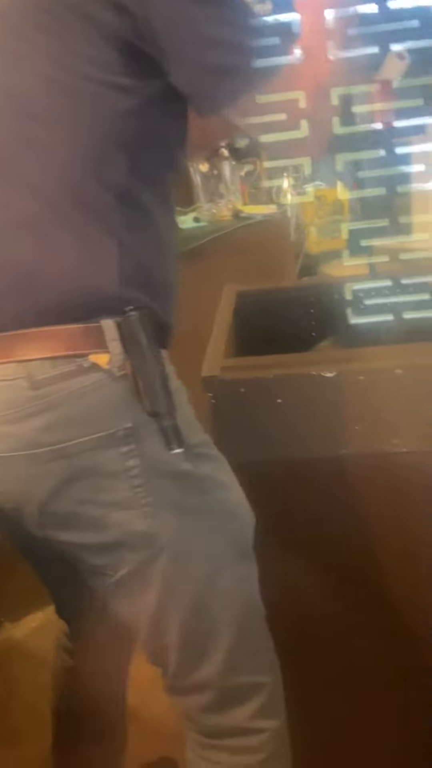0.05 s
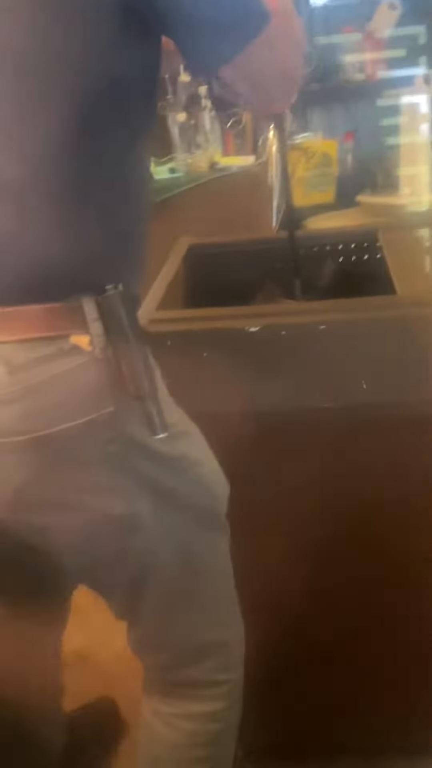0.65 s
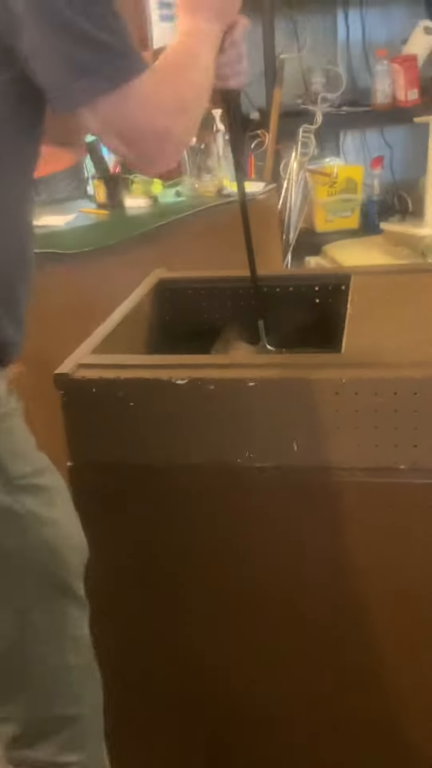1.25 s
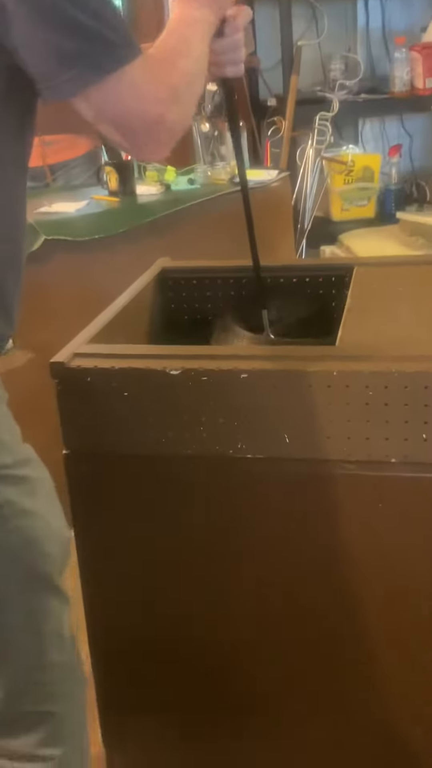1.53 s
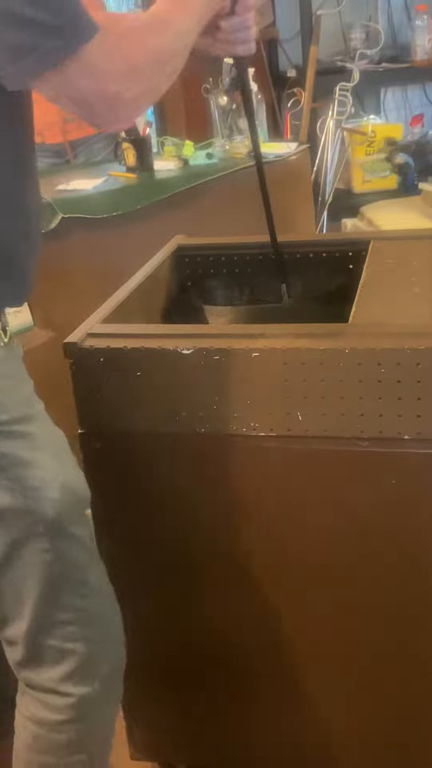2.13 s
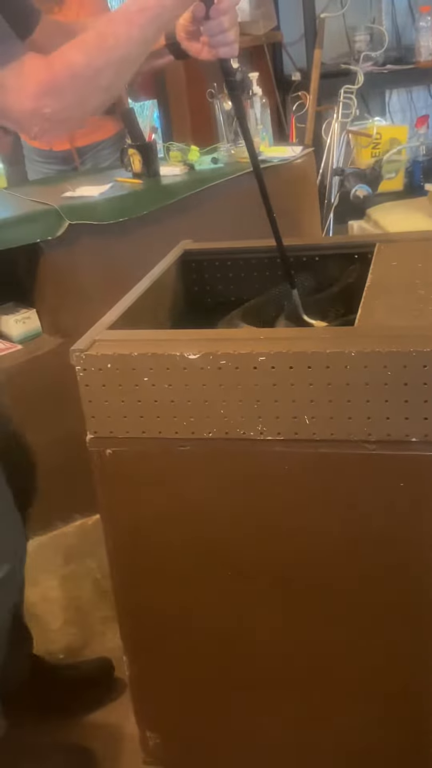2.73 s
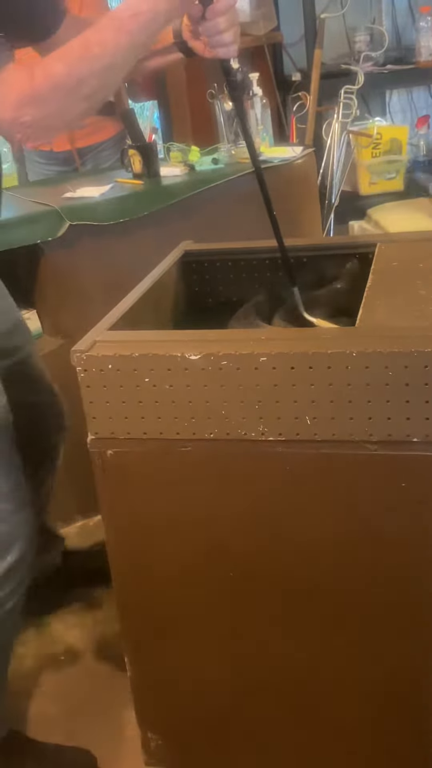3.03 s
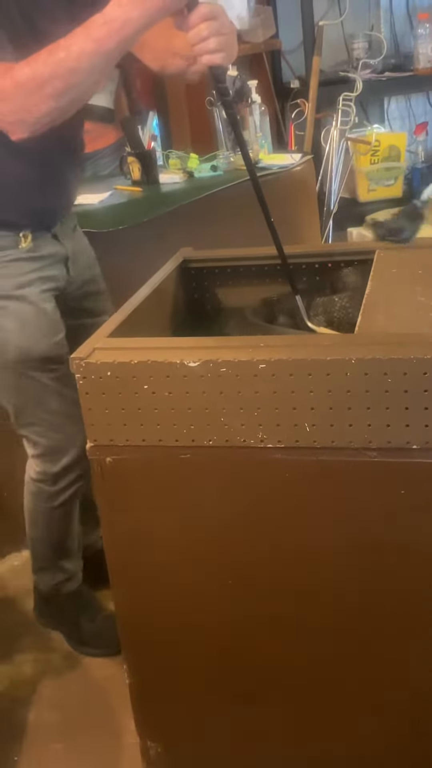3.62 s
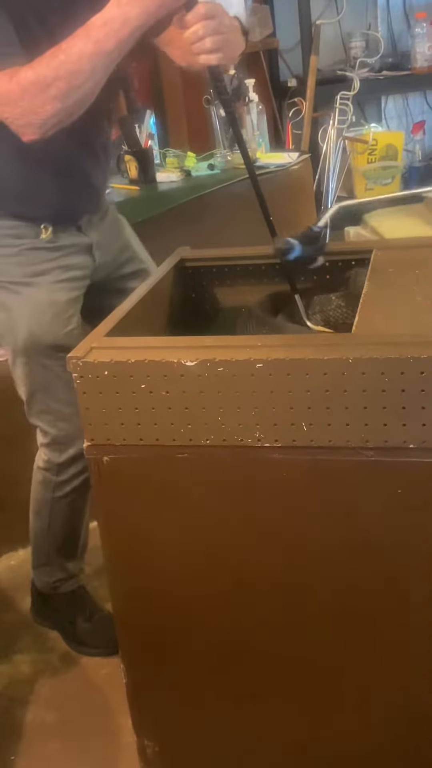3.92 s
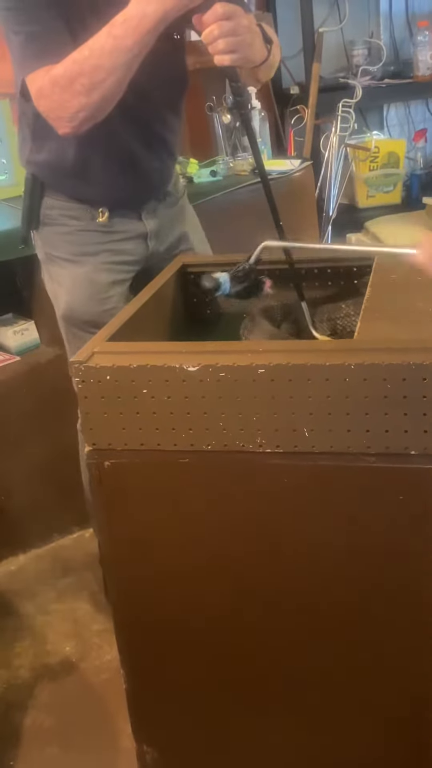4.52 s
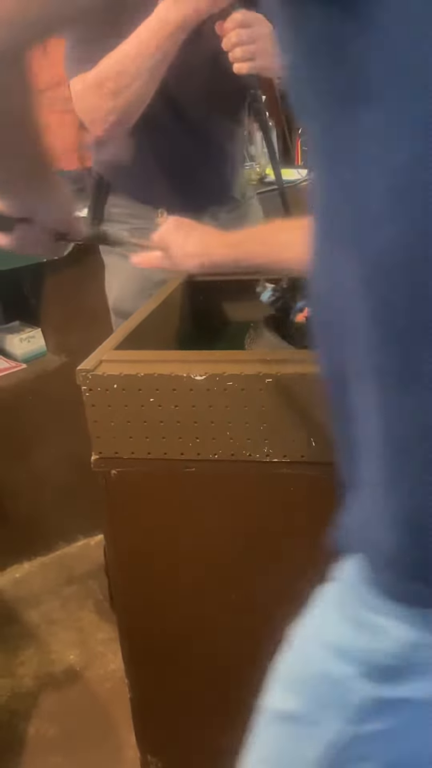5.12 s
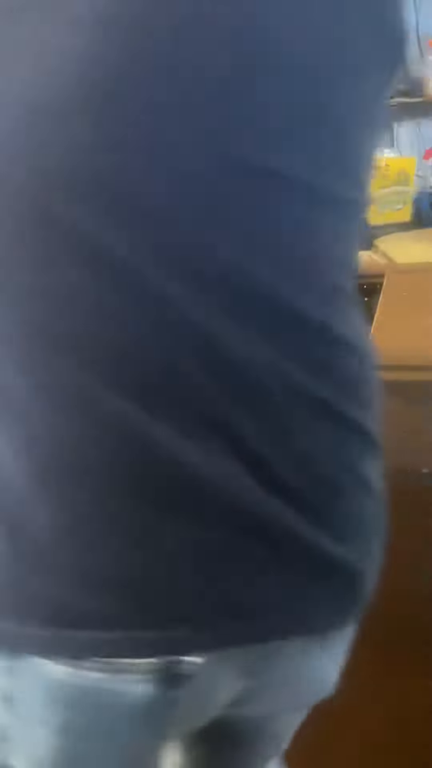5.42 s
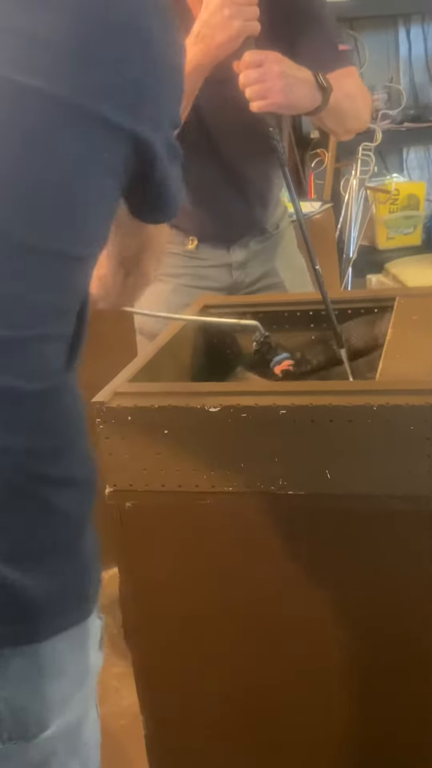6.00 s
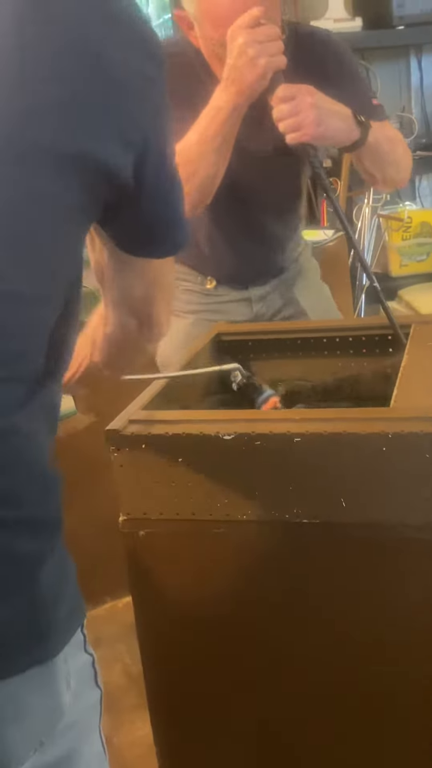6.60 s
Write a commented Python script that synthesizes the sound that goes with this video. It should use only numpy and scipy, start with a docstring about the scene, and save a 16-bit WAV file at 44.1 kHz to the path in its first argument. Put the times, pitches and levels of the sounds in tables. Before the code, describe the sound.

A steady low machine rumble with a drone, a motor hum and softly rushing air fills a room, louder for the first second and a half, when clothes also rustle faintly. A metal snake hook and tongs tap lightly on a wooden box at about 0.2 and 0.6 seconds. At 1.1 seconds comes the loudest event, a hard, sharp knock with a brief judder, followed at once by hollow, ringing wooden thuds. The room noise dips under it and swells back, and another dull bump lands at 1.4 seconds. Only the background continues until a low double thud at about 3.3 seconds, trailed by a few faint taps and a slight scuff up to 3.9 seconds. One more light knock with a thin metallic tick comes at 5.5 seconds. The hum swells around 6 seconds, and the rumble carries on to the end, near 6.7 seconds.

```python
"""In a room with a steady machine rumble, a metal snake hook and tongs bump against a wooden box.
Bending waves are dispersive, so each knock spreads through the panels treble first and bass last,
and the panel's modes ring on. Friction makes clothes rustle, a shoe scuff and the hook judder.
Behind them are rushing air, a low drone and a motor hum, louder at the start.
The hardest knock drives a limiter down, and the room swells back after it."""
import sys
import numpy as np
from scipy import signal
from scipy.fft import rfft, irfft
from scipy.io import wavfile
from scipy.ndimage import uniform_filter1d, minimum_filter1d

SR = 44100
rng = np.random.default_rng(int(sys.argv[2]) if len(sys.argv) > 2 else 0)


def int16_out(signal):
    """Quantize to a 16-bit WAV file."""
    q = np.round(np.clip(np.atleast_2d(signal).T, -1, 1) * 32767)
    wavfile.write(sys.argv[1], SR, q.astype(np.int16))


N = 297675
TIME = np.arange(N) / SR
FREQS = np.maximum(np.fft.rfftfreq(N, 1 / SR), 1)

# left-right likeness of the room noise: (frequency [Hz], correlation before clipping [-])
ROOM_CORRELATION = [(80, 1.5), (130, -0.4), (190, -0.52), (400, -0.2), (650, -0.88), (1000, 0),
                    (1900, 0.53), (3100, -.5), (4100, 0.23), (7000, -0.2)]
# balance of the room noise: (frequency [Hz], left minus right [dB])
ROOM_BALANCE = [(60, 6), (130, 3.5), (270, -3.5), (580, 0), (1240, 4.5), (2640, -2), (5620, 2.5),
                (12000, -1.5)]
# noise spectra of the ventilation and of cloth: (frequency [Hz], relative density [dB])
RUMBLE_SPECTRUM = [(18, -33), (30, -21), (40, -15), (52, -6), (68, -0.5), (82, -2), (97, -6), (120, -10.5),
                   (200, -17.5), (252, -11), (310, -22.5), (450, -22), (620, -33), (810, -70.5)]
RUSH_SPECTRUM = [(350, -48), (600, -24), (760, 3), (930, 2), (1080, -7), (1270, -8), (1540, -12),
                 (1800, -12.5), (2200, -26.5), (3000, -39.5), (3900, -75.5)]
HOLLOW_SPECTRUM = [(900, -30.5), (1150, -3.5), (1280, 6), (1420, -12), (1900, -19), (2400, -36)]
HISS_SPECTRUM = [(2200, -18.5), (3000, -2.5), (4100, 4), (5200, -2), (6000, -11), (7000, -23.5),
                 (9000, -46)]
CLOTH_SPECTRUM = [(20, -8), (40, 6), (100, -13), (160, -14), (280, -4.5), (600, 0), (1100, -8.5),
                  (1700, -24.5), (2500, -24.5), (3300, -47)]
# envelopes of the rushing air and the machine drone: (time [s], relative level [dB])
AIR_LEVELS = [(0.0, -48), (0.59, -52), (0.844, -48.5), (1.0, -47), (1.5, -53), (2.31, -55), (4.38, -51.5),
              (4.67, -53.5), (5.99, -47), (6.7, -48)]
DRONE_LEVELS = [(0.0, -30.5), (0.924, -26), (1.05, -27.5), (1.5, -35.5), (2.67, -36.5), (2.85, -41.5),
                (5.34, -49), (5.73, -38.5), (6.7, -42.5)]
# rubs of hook, cloth and shoe: (time [s], length [s], level [dB], band centre [Hz])
SCUFFS = [(0.252, .05, -55, 1200), (0.65, 0.03, -43, 1660), (1.06, .12, -70, 3990),
          (1.082, 0.02, -34, 322.8), (2.078, 0.093, -76, 3900), (3.576, 0.058, -69.5, 3900)]
# heavily damped resonances of hook and box: (frequency [Hz], width [Hz], relative level [dB])
BOX_RESONANCES = [(62, 53, -1.5), (185.3, 160, -1.5), (344, 134, -1), (559, 120, -7.5), (677, 380, -9),
                  (1084, 130, -18), (1464, 120, -14.5), (1690, 360, -16), (1980, 500, -20),
                  (2930, 480, -27.5), (3480, 600, -31), (4630, 380, -35), (5700, 900, -39),
                  (10200, 3500, -46.5), (14700, 2000, -52)]
# long-ringing modes of the panel: (frequency [Hz], relative level [dB], 60 dB decay time [s])
PANEL_MODES = [(164.3, -24, 0.6), (184, -25, 0.38), (250, -31.5, .3), (288, -33, 0.52), (339, -30, 0.22),
               (362, -21, 0.15)]
# lead of a knock in the right channel: (frequency [Hz], phase [rad])
RIGHT_PHASE_LEAD = [(100, .05), (330, .25), (550, .75), (1000, 1.1), (1800, .55), (4000, 1.1), (8000, 1.2),
                    (12000, 2.0)]
# knocks on the box: (time [s], strength [dB], upper corner [Hz], lower corner [Hz],
IMPACTS = [(0.2336, -22, 1100, 200, -4, -41, None), (0.561, -9.5, 131.7, 69, -23, -62, None),
           (0.6583, -16.5, 1610, 132.7, -20, -13, 0.034), (1.1006, 15, 9000, 42, -30.5, -33, 0.0064),
           (1.1490, 12.5, 476, 193, -13, -28, None), (1.168, 9.5, 320, 129, 6, -60, None),
           (1.1739, 12, 189, 107, -1, -65, None), (1.3650, 4.5, 242, 111.3, -20, -59.5, 0.016),
           (1.478, -32.5, 1200, 295.6, -25, -28, None), (3.2640, 1, 295, 112, -29, -31, 0.00394),
           (3.279, -4.5, 151, 60, -34, -53, None), (3.332, -22.5, 200, 149, -13, -62, None),
           (3.574, -26, 394, 145, -21, -34.5, None), (3.6745, -17, 416, 111, -32.5, -47.5, None),
           (3.849, -21.5, 178, 129, -9, -62, None), (5.4609, -16, 705, 110, -23.5, -24.5, .031)]
# a light graze: (upper corner [Hz], lower corner [Hz], ring gain [dB], tick gain [dB])
GRAZE_CONTACT = (749, 301, -17, -43.5)


def from_db(db):
    """Amplitude ratio: tenfold for every 20 dB."""
    return 10 ** (np.asarray(db) / 20)


def rms_one(x):
    """Normalisation to unit power."""
    return x / np.sqrt(np.mean(x ** 2) + 1e-20)


def in_time(points):
    """Linear interpolation of an envelope at every sample."""
    return np.interp(TIME, *np.transpose(points))


def at_hz(points, hz, **ends):
    """Interpolation on a log-frequency axis."""
    f, value = np.transpose(points)
    return np.interp(np.log(hz), np.log(f), value, **ends)


def panned(pan_db):
    """Level-difference panning: gains with the left pan_db above the right."""
    return from_db(np.array([[.5], [-.5]]) * pan_db)


def drift(rate_hz):
    """Random fluctuation: low-passed noise of unit power."""
    return rms_one(irfft(rfft(rng.standard_normal(N)) * np.exp(-(FREQS / rate_hz) ** 2), N))


def rise(s, spread_s):
    """A sigmoid step from 0 to 1 around time s."""
    return .5 + .5 * np.tanh((TIME - s) / (2 * spread_s))


def swell(s, length_s):
    """A Gaussian envelope of height 1 around time s."""
    return np.exp(-(2 * (TIME - s) / length_s) ** 2)


def unsettled():
    """A sigmoid fall: 1 during the louder start, 0 once the background has settled."""
    return 1 - rise(1.6, spread_s=.17)


def add(out, s, sound):
    """Superposition of a short sound from time s."""
    start = round(s * SR)
    out[:, start:start + sound.shape[-1]] += sound[..., :N - start]


def room_noise(spectrum, ripple_db=2.5):
    """A diffuse field is partly correlated at two points; the channels' mean has unit power."""
    # reflections leave fine fixed peaks and dips in the upper spectrum
    ripple = rms_one(uniform_filter1d(rng.standard_normal(len(FREQS)), size=250))
    ripple *= np.minimum(FREQS / 2000, 1)
    shape = from_db(at_hz(spectrum, FREQS, left=-90, right=-120) + ripple_db * ripple)
    mid, side = rfft(rng.standard_normal((2, N))) * shape
    correlation = np.clip(at_hz(ROOM_CORRELATION, FREQS), -.9, .98)
    side *= np.sqrt((1 - correlation) / (1 + correlation))
    pair = irfft(np.array([mid + side, mid - side]) * panned(at_hz(ROOM_BALANCE, FREQS)), N)
    return pair / pair.mean(axis=0).std()


def ventilation(rumble_follows=.35, hiss_follows=.37):
    """Broadband flow noise: rumble and hiss follow the air's swing in part; a hollow note joins."""
    air_db = in_time(AIR_LEVELS)
    swing_db = air_db - air_db.mean()
    rumble = from_db(-40 + rumble_follows * swing_db + 6 * unsettled()) * room_noise(RUMBLE_SPECTRUM)
    rush = from_db(-50 + swing_db) * room_noise(RUSH_SPECTRUM)
    hollow = from_db(-59.5) * rise(3.55, spread_s=.07) * room_noise(HOLLOW_SPECTRUM)
    hiss = from_db(-78 + hiss_follows * swing_db + 5 * unsettled()) * room_noise(HISS_SPECTRUM)
    return rumble + rush + hollow + hiss


def machines(drone_hz=68.3, excess_hz=8.5, sag_s=1.05, hum_hz=120.6, housing_hz=257, width_hz=22):
    """Periodic vibration radiates tones: a wavering drone with a resonant housing, and a motor hum."""
    level_db = in_time(DRONE_LEVELS)
    drone_gain = from_db(level_db - 1 + .9 * drift(8))
    # the drone runs a little fast at first and sags to its steady pitch
    pitch_hz = drone_hz + excess_hz * np.exp(-TIME / sag_s) + 1.2 * drift(1.2)
    drone = drone_gain * np.sin(2 * np.pi * np.cumsum(pitch_hz) / SR)
    hum_db = -54 + 7.5 * unsettled() + 15.2 * swell(6.01, length_s=1.58) + .4 * drift(2.7)
    hum = from_db(hum_db) * np.sin(2 * np.pi * hum_hz * TIME)
    resonance = 1 / (1 + ((FREQS - housing_hz) / width_hz) ** 4)
    housing = irfft(rfft(rng.standard_normal((2, N))) * resonance, N)
    tones = np.sqrt(2) * (drone + hum) * panned(5)
    return tones + from_db(level_db - 11) * rms_one(housing)


def rubbing(cloth_db=-64, lift_db=15.5):
    """Sliding friction makes noise: clothes rustle, louder at first, and grainy scuffs come and go."""
    cloth_shape = from_db(at_hz(CLOTH_SPECTRUM, FREQS, left=-90, right=-90))
    cloth = rms_one(irfft(rfft(rng.standard_normal(N)) * cloth_shape, N))
    out = from_db(cloth_db + lift_db * unsettled() + 1.6 * drift(12)) * cloth
    grains = rng.standard_normal(N) * from_db(2.5 * drift(250))
    for s, length_s, db, hz in SCUFFS:
        band = signal.butter(4, [hz * .6, hz * 1.35], "band", fs=SR, output="sos")
        out += from_db(db) * swell(s, length_s) * rms_one(signal.sosfilt(band, grains))
    return out * panned(1.5)


def judder(s=1.1035, pitch_hz=521, peak_db=3, right_lead_rad=.94):
    """Stick-slip oscillation: the hook skids for a few cycles as it lands the hardest knock."""
    phase = 2 * np.pi * pitch_hz * (TIME - s) + np.array([[0], [right_lead_rad]])
    return from_db(peak_db) * swell(s, length_s=.010) * np.sin(phase)


def bending_wave(hz, t, body_db=39, scatter_db=-17, scatter_t60=.07):
    """Dispersion: low frequencies travel slower, so a falling chirp passes the box's resonances."""
    power = sum(from_db(db) ** 2 / (1 + ((hz - f) / width) ** 2) ** 5 for f, width, db in BOX_RESONANCES)
    delay_s = .00655 * (300 / (hz + 20)) ** .8
    phase = 2 * np.pi * np.cumsum(delay_s) * SR / len(t)
    direct = from_db(body_db) * np.sqrt(power) * np.exp(-1j * phase)
    # edges and joints send back a short, dull scatter, different for every spot that is struck
    echoes = rng.standard_normal(len(t)) * from_db(-60 * t / scatter_t60)
    scatter = from_db(scatter_db) * rfft(echoes / np.linalg.norm(echoes))
    return direct * (1 + scatter / (1 + (hz / 1100) ** 2))


def panel_ring(t, ring_db, onset_s=.0054):
    """Free vibration: the spectrum of the panel's modes, each decaying exponentially."""
    modes = sum(from_db(db + ring_db - 60 * t / t60) * np.sin(2 * np.pi * f * t)
                for f, db, t60 in PANEL_MODES)
    return rfft(modes * (1 - np.exp(-(t / onset_s) ** 2)))


def knock(upper_hz, lower_hz, ring_db, tick_db, size):
    """Impact excitation: the spectrum of one contact multiplies the response of the box."""
    hz = np.maximum(np.fft.rfftfreq(size, 1 / SR), 1)
    t = np.arange(size) / SR
    response = bending_wave(hz, t) + panel_ring(t, ring_db)
    # a soft contact loses the treble, a light one cannot move the whole box
    contact = 1 / np.sqrt((1 + (hz / upper_hz) ** 4) * (1 + (lower_hz / hz) ** 4))
    # bare metal touching down adds a thin tick
    tick = from_db(tick_db) * np.exp(-3 * np.log(hz / 4800) ** 2)
    quarter_window_delay = np.exp(-2j * np.pi * hz * size / 4 / SR)
    right = response * (contact + tick) * quarter_window_delay
    left = right * np.exp(-1j * at_hz(RIGHT_PHASE_LEAD, hz))
    return irfft(np.array([left, right]), size)


def knocks(graze_db=-16.5, graze_follows=.69, size=32768):
    """Impulse responses add: hook and tongs strike the box, at times grazing it before they land."""
    out = np.zeros((2, N))
    for s, db, *contact, lead_s in IMPACTS:
        start_s = s - size / 4 / SR  # the contact lies a quarter of the way into its window
        add(out, start_s, from_db(db) * knock(*contact, size))
        if lead_s:
            graze = from_db(graze_db + graze_follows * db) * knock(*GRAZE_CONTACT, size)
            add(out, start_s - lead_s, graze)
    return out


def scene():
    """Superposition: knocks and rubs add to the noise of the room."""
    return knocks() + judder() + rubbing() + machines() + ventilation()


def limiter(x, ceiling_db=-.74, hold_s=.14, release_db_per_s=105):
    """Peak limiting: excess over the ceiling pulls the gain down at once; it holds, then climbs back."""
    peak_db = 20 * np.log10(np.abs(x).max(axis=0) + 1e-9)
    over_db = np.maximum(peak_db - ceiling_db, 0)
    half_hold = int(hold_s * SR / 2)
    held_db = -minimum_filter1d(-over_db, 2 * half_hold + 1, origin=half_hold)
    release_db = release_db_per_s * TIME
    cut_db = np.maximum.accumulate(held_db + release_db) - release_db
    # about a millisecond of look-ahead rounds the attack
    gain_db = uniform_filter1d(minimum_filter1d(-cut_db, size=61), size=61)
    return x * from_db(gain_db)


def record(dry):
    """Band limiting: after the limiter, a steep low-pass stops the treble above 17 kHz."""
    lowpass = signal.cheby2(12, 70, 17000, fs=SR, output="sos")
    return signal.sosfilt(lowpass, limiter(dry))


dry = scene()
out = record(dry)
int16_out(out)
```